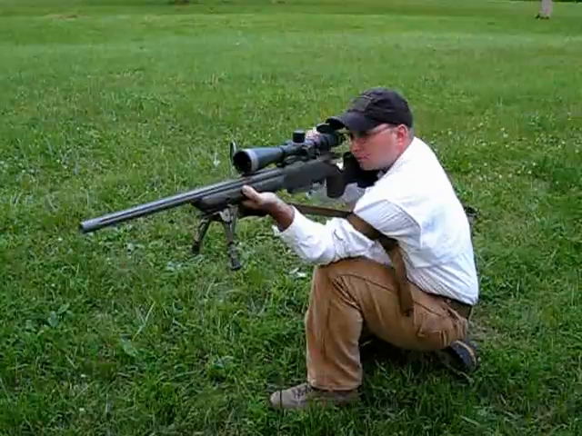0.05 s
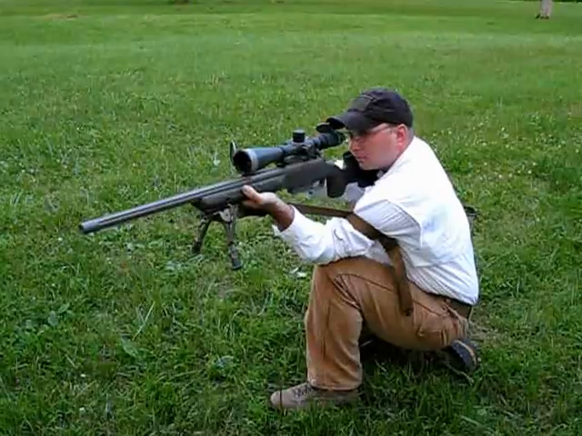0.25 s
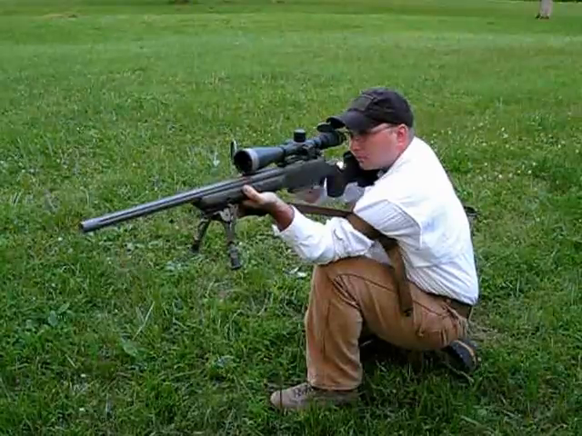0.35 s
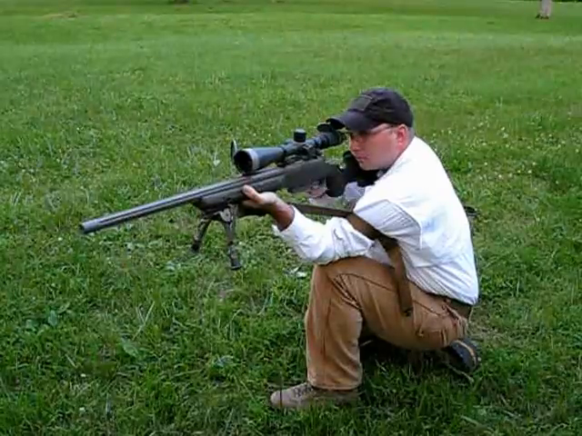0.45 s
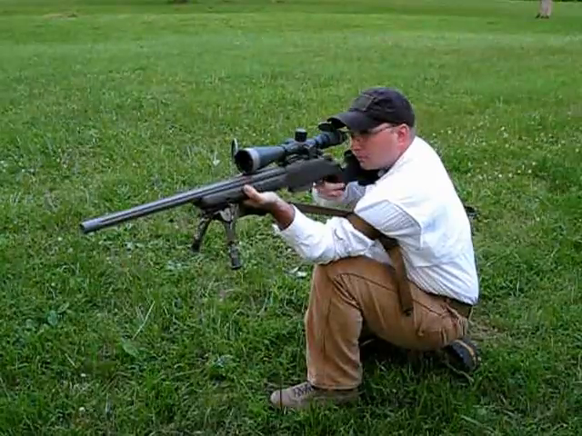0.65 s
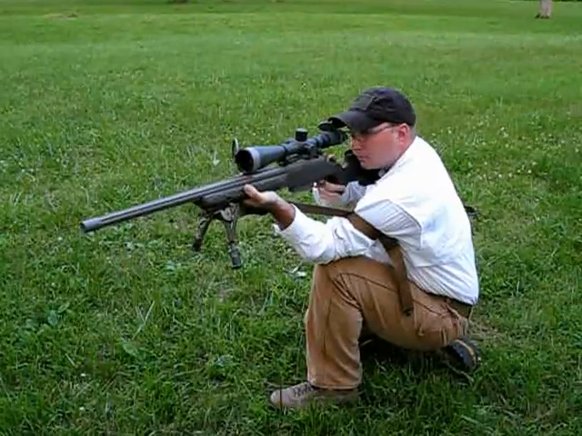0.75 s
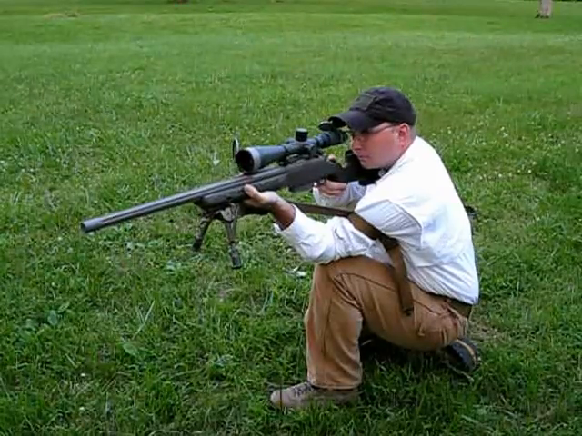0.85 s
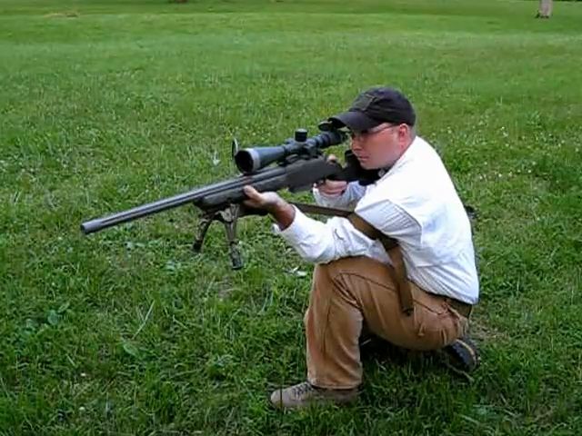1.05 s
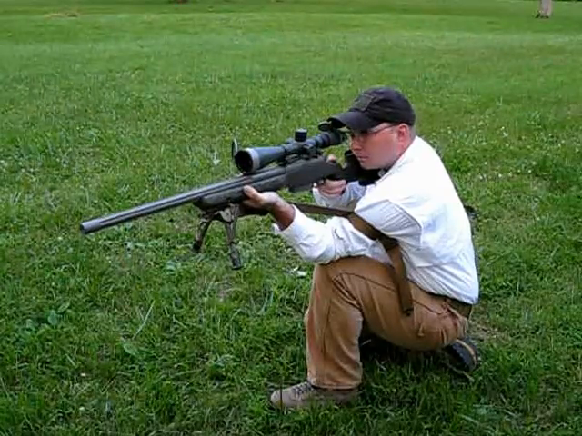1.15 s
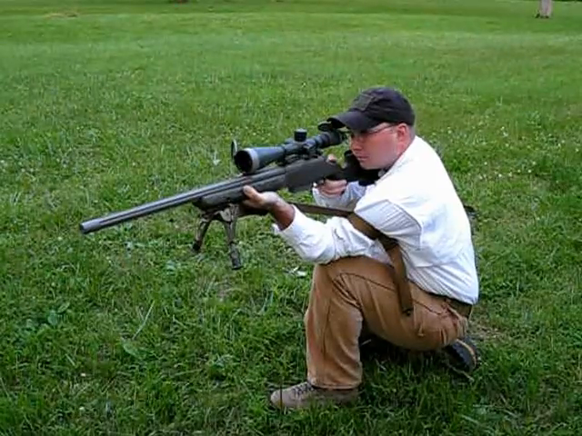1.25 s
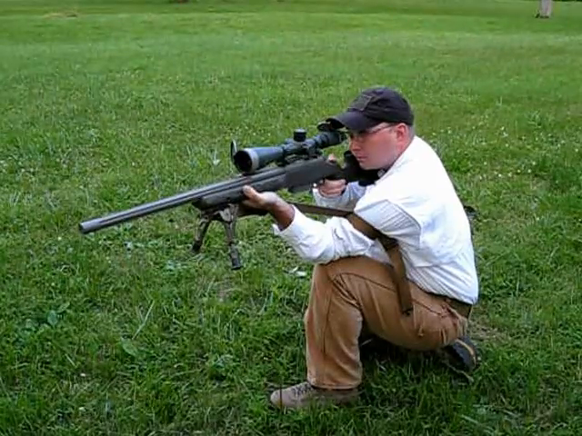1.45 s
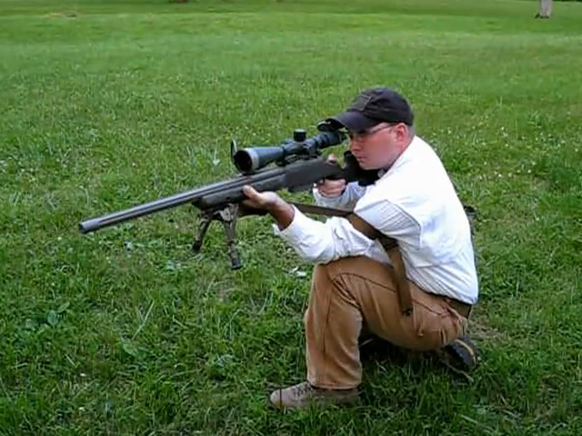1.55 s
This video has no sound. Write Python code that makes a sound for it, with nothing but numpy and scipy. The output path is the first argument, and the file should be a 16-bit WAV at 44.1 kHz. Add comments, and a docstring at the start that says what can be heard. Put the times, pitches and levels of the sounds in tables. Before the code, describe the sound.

A rifle bolt is pushed home and locked in rapid dry metallic clicks, close and loud on an open lawn; far birds chirp over a low distant hum and soft air noise.

```python
"""A rifle's bolt is pushed home, cocked and locked on an open lawn, close to the microphone.
From the start, shaped noise gives the outdoor wash, low drone and soft sliding hiss; far birds whistle as gliding sines.
Near 0.2 s light touches, then a sharp snap, a rattle, a small catch and a lock at 0.4 s excite damped steel modes,
noise cracks and air pushes. They overload softly and scatter as a faint echo from ground and trees.
From 0.68 s further bird notes sound, with a thin high call at 1.1 s."""
import sys
import numpy as np
from scipy import signal
from scipy.fft import rfft, irfft
from scipy.io import wavfile
from scipy.ndimage import uniform_filter1d

SR = 44100
rng = np.random.default_rng(int(sys.argv[2]) if len(sys.argv) > 2 else 0)


def unload_wav(signal):
    """Save mono or channel-first audio to the path in sys.argv[1] as 16-bit WAV at rate SR, clipped to [-1, 1]."""
    wavfile.write(
        sys.argv[1],
        SR,
        np.round(np.clip(np.atleast_2d(signal).T, -1, 1) * 32767).astype(np.int16),
    )


N = 70560

# Spectrum of the outdoor wash: (frequency [Hz], relative density [dB per Hz])
WASH_SPECTRUM = [(25, -36), (45, -40), (66, -9), (82, -11.5), (107, -6), (165, -14), (200, -9.5),
                 (250, -12.5), (433, -12), (600, -11), (860, -5), (1100, -5.5), (1570, -11.5), (2100, -15),
                 (2900, -15.5), (4000, -22), (5000, -23.5), (11800, -30.5), (15500, -38.5)]
# Low far-off drone bands: (centre [Hz], width [Hz], level at mid-scene [dB])
DRONE_BANDS = [(65.3, 3.6, -78.5), (102.2, 6.1, -61)]
# Strokes of steel and sleeve sliding: (start [s], length [s], level [dB], treble tilt [dB per octave])
SLIDE_STROKES = [(-0.015, 0.1, -40.5, -3), (0.092, 0.011, -36.5, -7.5), (0.096, 0.091, -46.5, -4.5),
                 (0.178, .022, -41.5, -2.5), (0.263, 0.07, -44.5, 3)]
# Spectrum of sliding friction: (frequency [Hz], relative density [dB per Hz])
SLIDE_SPECTRUM = [(300, -16.5), (2000, -4.5), (4000, -5.5), (6300, -5.5), (8500, -8), (11000, -5.5),
                  (14000, -7.5), (16000, -18)]
# Bird notes, level before the direct and echo gains:
# (start [s], length [s], level [dB], start pitch [Hz], middle pitch [Hz], end pitch [Hz])
BIRD_NOTES = [(0.008, 0.06, -37.5, 3514, 3050, 2950), (0.101, 0.04, -40.5, 2560, 2650, 2430),
              (0.19, 0.022, -34.5, 2860, 2880, 2600), (0.68, 0.025, -44.5, 2880, 3020, 3020),
              (0.727, 0.047, -44, 3026, 2920, 2910), (0.774, 0.0434, -42, 2500, 2410, 2350),
              (0.82, .055, -52.5, 3190, 3230, 3650), (0.825, 0.051, -49, 2390, 2250, 2170),
              (1.259, 0.0215, -42.5, 3504, 3050, 2610)]
# Energy scattered back by ground and trees: (delay [s], relative level [dB])
ECHO_DECAY = [(0.008, 10.5), (0.025, -1.5), (0.04, -2), (0.052, 2), (0.085, -2), (0.12, -11.5), (0.2, -15),
              (0.4, -32)]
# Spectrum of the scattered echo: (frequency [Hz], relative density [dB per Hz])
ECHO_SPECTRUM = [(100, -19), (300, -1.5), (1000, -1.5), (2000, -3), (2700, 1.5), (3300, -1), (4600, -2.5),
                 (5500, 3), (6400, -4.5), (7300, -0.5), (9000, -9.5), (11000, -7.5), (14000, -15),
                 (16000, -19)]

# Blows of the bolt pushed home, a sharp snap with light touches before it and rebounds:
# (time [s], level [dB], contact [s], treble tilt [dB per octave])
SNAP_BLOWS = [(0.1982, -29.5, 0.0021, -4), (0.2261, -44, 0.003, 0), (0.2274, -3, 0.001906, 2),
              (0.2322, -13, 0.00049, -2)]
# Blows of the action rattling as it is cocked:
# (time [s], level [dB], contact [s], treble tilt [dB per octave])
RATTLE_BLOWS = [(0.3108, -44, 0.0016, -1), (0.3139, -13.5, 0.0015, 5), (0.3195, -28, 0.0014, 8),
                (0.3223, -22, 0.0031, -3.5)]
# Blows of a small catch riding over and dropping in:
# (time [s], level [dB], contact [s], treble tilt [dB per octave])
CATCH_BLOWS = [(0.3470, -30.5, 0.0034, 6), (0.3520, -18, 0.00136, 4.5)]
# Blow of the bolt locking shut: (time [s], level [dB], contact [s], treble tilt [dB per octave])
LOCK_BLOWS = [(0.4028, -2, 0.0021, 1)]
# Modes of the bolt: (frequency [Hz], relative level [dB], t60 before body damping [s])
BOLT_MODES = [(1203, -3, 0.014), (1743, -6, 0.014), (2126, -3, 0.017), (2723, 1, 0.016),
              (3126, -1.5, 0.024), (3576, 1.5, 0.022), (4250, 0, .016), (4890, -5, 0.04), (5740, -6, 0.043),
              (6160, -3.5, 0.0052), (7020, -3.5, 0.015), (7190, -3.5, 0.0076), (7540, -7, 0.0084),
              (8090, -2, 0.0058), (8654, -5.5, 0.0076), (9970, -6.5, 0.0057), (10570, -11, .012),
              (11940, -6, 0.0064), (14400, -14, .012)]
# Modes of the cam: (frequency [Hz], relative level [dB], t60 before body damping [s])
CAM_MODES = [(638, -17.5, 0.44), (706, -20, .1), (1021, -10, 0.18), (1740, -1.5, 0.022), (1960, -1, .04),
             (2094, 0.5, .04), (2540, -1.5, 0.045), (2880, 0, 0.03), (3480, -4.5, 0.018),
             (4900, -1.5, 0.017), (5840, -17, 0.028), (6450, -20, .02)]
# Modes of the catch: (frequency [Hz], relative level [dB], t60 before body damping [s])
CATCH_MODES = [(2150, 6.5, 0.01), (2480, 8, 0.026), (2850, 6.5, 0.034), (3330, -1, 0.025),
               (5050, -3.5, 0.053), (5900, -4, 0.025), (7000, -12, 0.017)]
# Modes of the receiver: (frequency [Hz], relative level [dB], t60 before body damping [s])
RECEIVER_MODES = [(773, -7, .02), (965, -6.5, 0.022), (1236, -14.5, .018), (1416, -9.5, 0.019),
                  (1752, -8.5, 0.03), (2354, -1.5, 0.0073), (2715, -1.5, 0.02), (3420, 1.5, 0.0051),
                  (3640, -7.5, 0.0088), (4100, -14, 0.024), (4596, -8.5, 0.017), (5020, -10, 0.026),
                  (5236, -3.5, 0.02), (5780, -15, 0.014), (7130, -8.5, 0.0099), (10180, -19, 0.025),
                  (13070, -15, .012)]
# Broadband crack of the bolt: (frequency [Hz], relative density [dB per Hz])
BOLT_CRACK_SPECTRUM = [(40, -19), (200, -11.5), (900, -5.5), (2500, 5), (7500, -0.5), (10000, -5),
                       (14000, -9), (16000, -23)]
# Broadband crack of the cam, also used for the catch: (frequency [Hz], relative density [dB per Hz])
CAM_CRACK_SPECTRUM = [(40, -32), (300, -13), (900, 4.5), (2300, 2.5), (5000, -2.5), (8000, -13),
                      (11000, -30), (16000, -47)]
# Broadband crack of the receiver: (frequency [Hz], relative density [dB per Hz])
RECEIVER_CRACK_SPECTRUM = [(40, -30), (400, -23), (900, -3.5), (2800, 4.5), (5500, 3), (8500, -9.5),
                           (13000, -7), (16000, -10)]

WASH_DB, DRONE_RISE_DB_PER_S = -44.5, 7
CALL_S, CALL_LENGTH_S, CALL_HZ, CALL_WIDTH_HZ = 1.1, 0.18, 7400, 330
CALL_DB = -55  # before the direct and echo gains
BIRD_DIRECT_DB, BIRD_ECHO_DB, BIRD_ECHO_T60_S = -4.5, -5, 0.54
ECHO_DB = -22
RISE_S = 0.00047  # onset ramp of each blow
PUSH_PEAK_S = 0.000071  # time for the air push to reach its peak
LIMIT_DB, DUCK_SHARE, HOLD_FALL_DB_PER_S = -20, 0.25, 183
CEILING = 0.87  # full-scale amplitude at which the overload saturates
LOW_CUT_HZ, EDGE_HZ = 55, 15900


def amp(db):
    """Logarithmic level law: decibels to amplitude gain."""
    return 10 ** (np.asarray(db) / 20)


def unit(x):
    """Normalization of mean power: scales to rms 1."""
    return x / np.sqrt(np.mean(x ** 2) + 1e-20)


def add(mix, s, sound):
    """Superposition: adds a sound at time s, dropping whatever lies outside the mix."""
    at = round(s * SR)
    sound = sound[max(-at, 0):]
    part = mix[max(at, 0):][:len(sound)]
    part += sound[:len(part)]


def tilt(hz, tilt_db):
    """Power-law spectrum: a slope in dB per octave about 3500 Hz, level below 800 Hz."""
    octaves = np.log2(np.maximum(hz, 800) / 3500)
    return amp(tilt_db * octaves)


def colour(x, points, tilt_db=0):
    """Linear filtering: multiplies the spectrum by a gain curve through (Hz, dB) points."""
    hz = np.fft.rfftfreq(len(x), 1 / SR)
    point_hz, point_db = np.transpose(points)
    gain = amp(np.interp(np.log(hz + 1), np.log(point_hz), point_db))
    return irfft(rfft(x) * gain * tilt(hz, tilt_db), len(x))


def noise(points, tilt_db=0, size=8192):
    """Random broadband source: filtered white noise of rms 1."""
    return unit(colour(rng.standard_normal(size), points, tilt_db))


def fuzzy_tone(hz, width_hz):
    """Narrow-band noise: a Gaussian passband gives a tone with random fluctuations."""
    f = np.fft.rfftfreq(N, 1 / SR)
    passband = np.exp(-.5 * ((f - hz) / width_hz) ** 2)
    return unit(irfft(rfft(rng.standard_normal(N)) * passband, N))


def arch(length):
    """Amplitude envelope: half a sine cycle, a smooth rise and fall."""
    return np.sin(np.linspace(0, np.pi, round(length * SR)))


def outdoors():
    """Stationary ambient noise: a steady distant wash with a low narrow-band drone that slowly grows."""
    wash = amp(WASH_DB) * noise(WASH_SPECTRUM, size=N)
    drone = sum(amp(db) * fuzzy_tone(hz, width) for hz, width, db in DRONE_BANDS)
    from_middle_s = (np.arange(N) - N / 2) / SR
    return wash + amp(DRONE_RISE_DB_PER_S * from_middle_s) * drone


def slides(grain_db=3):
    """Sliding friction: randomly modulated, grainy hiss swells and fades with each stroke."""
    out = np.zeros(N)
    for s, length, level_db, tilt_db in SLIDE_STROKES:
        grain = amp(grain_db * unit(uniform_filter1d(rng.standard_normal(N), size=60)))
        hiss = unit(noise(SLIDE_SPECTRUM, tilt_db, size=N) * grain)
        stroke = arch(length)
        add(out, s, amp(level_db) * stroke * hiss[:len(stroke)])
    return out


def birds(waver=0.024):
    """Frequency modulation: gliding, slightly wavering sine whistles, and one thin narrow-band call."""
    out = np.zeros(N)
    for s, length, level_db, *pitch in BIRD_NOTES:
        swell = arch(length)
        glide = np.polyfit([0, .5, 1], pitch, 2)  # parabola through the three pitches
        hz = np.polyval(glide, np.linspace(0, 1, len(swell)))
        wander = unit(uniform_filter1d(rng.standard_normal(N), size=80))[:len(swell)]
        hz = hz * (1 + waver * wander)
        whistle = np.sin(2 * np.pi * np.cumsum(hz) / SR)
        add(out, s, amp(level_db) * np.sqrt(2 * swell) * whistle)
    swell = arch(CALL_LENGTH_S)
    call = fuzzy_tone(CALL_HZ, CALL_WIDTH_HZ)[:len(swell)]
    add(out, CALL_S, amp(CALL_DB) * swell * call)
    return out


def woods(x):
    """Diffuse reverberation among far trees: convolution with exponentially decaying noise."""
    t = np.arange(SR // 2) / SR
    tail = rng.standard_normal(len(t)) * np.exp(-np.log(1000) * t / BIRD_ECHO_T60_S)
    return signal.fftconvolve(x, tail / np.linalg.norm(tail))[:N]


def echo(x):
    """Incoherent scattering: lawn and trees spread the rifle's energy in time as a soft, toneless wash."""
    t = np.arange(SR // 2) / SR
    arrived = t > ECHO_DECAY[0][0]
    spread = (amp(np.interp(t, *np.transpose(ECHO_DECAY))) * arrived) ** 2
    power = signal.fftconvolve(x ** 2, spread / spread.sum())[:N]
    return np.sqrt(abs(power)) * noise(ECHO_SPECTRUM, size=N)


def damping(free, left=0.63, settle=0.0047):
    """Energy absorption: stock and hands soak up part of the ring, with a t60 of settle seconds."""
    return left + (1 - left) * np.exp(-free / settle)


def push(t):
    """Pressure pulse: one short push on the air, which carries the bass of a blow."""
    u = t / PUSH_PEAK_S
    return u * np.exp(1 - u)


def clicks(blows, modes, crack, crack_db, crack_t60, push_db, size=8192):
    """Modal excitation by impact: grinding contact, then a push on the air as crack and modes die away."""
    out, t = np.zeros(N), np.arange(size) / SR
    hz, db, t60 = np.transpose(modes)[:, :, None]
    sign = (-1) ** np.arange(len(hz))[:, None]  # neighbouring modes start in opposite phase
    weight = sign * amp(db) / np.linalg.norm(amp(db)) * np.sqrt(2)
    for s, level_db, contact, tilt_db in blows:
        free = np.maximum(t - contact, 0) * np.log(1000)  # decay starts when contact ends
        ring = weight * tilt(hz, tilt_db) * np.exp(-free / t60) * np.sin(2 * np.pi * hz * t)
        burst = amp(crack_db) * noise(crack, tilt_db) * np.exp(-free / crack_t60)
        onset = np.minimum(t / RISE_S, 1)
        add(out, s, amp(level_db) * onset * (ring.sum(0) + burst) * damping(free))
        add(out, s + contact, amp(level_db + push_db) * push(t))
    return out


def scene():
    """Superposition of sources: open air, the rifle close by, its echo and the far birds."""
    air = outdoors()
    sliding = slides()
    song = birds()
    snap = clicks(SNAP_BLOWS, BOLT_MODES, BOLT_CRACK_SPECTRUM,
                  crack_db=-5, crack_t60=0.036, push_db=-6)
    rattle = clicks(RATTLE_BLOWS, CAM_MODES, CAM_CRACK_SPECTRUM,
                    crack_db=-6.5, crack_t60=0.045, push_db=-10)
    catch = clicks(CATCH_BLOWS, CATCH_MODES, CAM_CRACK_SPECTRUM,
                   crack_db=-7, crack_t60=0.027, push_db=-7)
    lock = clicks(LOCK_BLOWS, RECEIVER_MODES, RECEIVER_CRACK_SPECTRUM,
                  crack_db=-6.5, crack_t60=0.03, push_db=-13)
    rifle = sliding + snap + rattle + catch + lock
    far_birds = amp(BIRD_DIRECT_DB) * song + amp(BIRD_ECHO_DB) * woods(song)
    return (air + rifle + amp(ECHO_DB) * echo(rifle) + far_birds)[None]


def record(dry):
    """Compression and saturation: gain dips after loud clicks, peaks overload softly, then the band is limited."""
    power_db = 10 * np.log10(abs(uniform_filter1d(dry[0] ** 2, size=100)) + 1e-12)
    fall = np.arange(N) * HOLD_FALL_DB_PER_S / SR
    held_db = np.maximum.accumulate(power_db + fall) - fall  # peak level, sinking steadily
    over_db = np.maximum(held_db - LIMIT_DB, 0)
    lagged_db = signal.lfilter([.005], [1, -.995], over_db)  # the gain follows with a lag of about 4.5 ms
    ducked = dry * amp(-DUCK_SHARE * lagged_db)
    loud = CEILING * np.tanh(ducked / CEILING)
    low_cut = signal.butter(3, LOW_CUT_HZ, "high", fs=SR, output="sos")
    loud = signal.sosfilt(low_cut, loud)
    band_limit = signal.firwin(301, EDGE_HZ, window=("kaiser", 9), fs=SR)
    return signal.oaconvolve(loud, band_limit[None], "same")


dry = scene()
out = record(dry)
unload_wav(out)
```